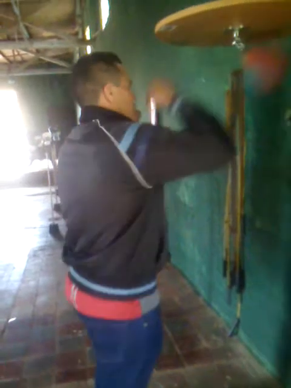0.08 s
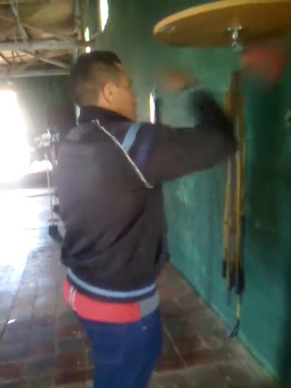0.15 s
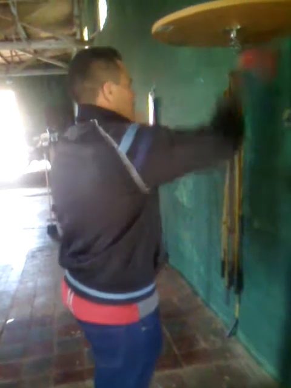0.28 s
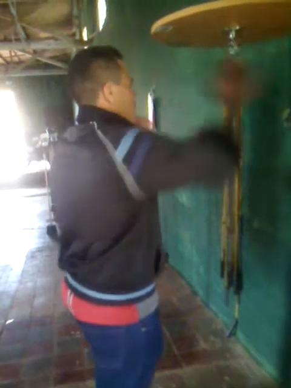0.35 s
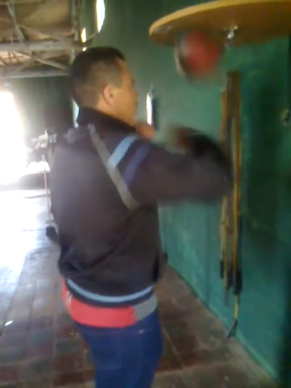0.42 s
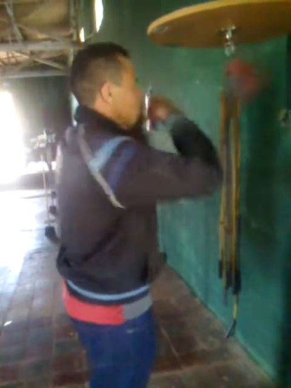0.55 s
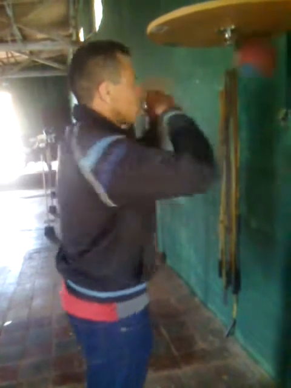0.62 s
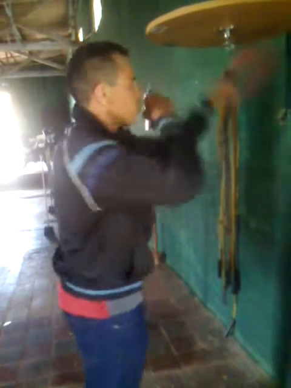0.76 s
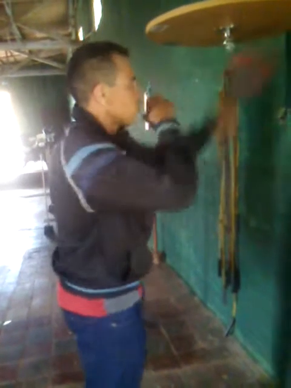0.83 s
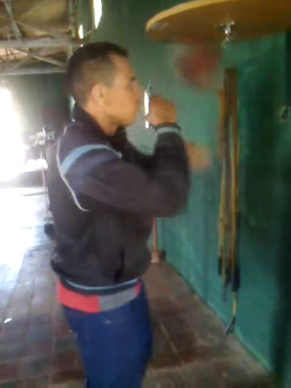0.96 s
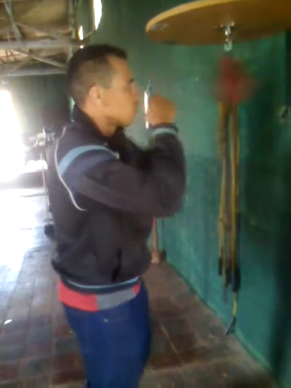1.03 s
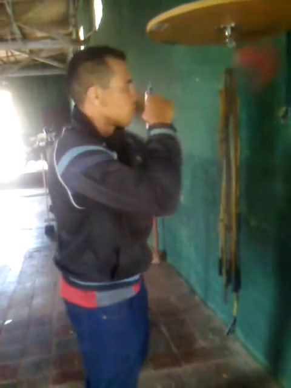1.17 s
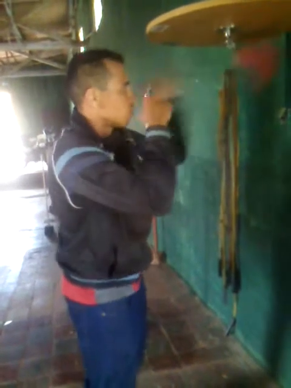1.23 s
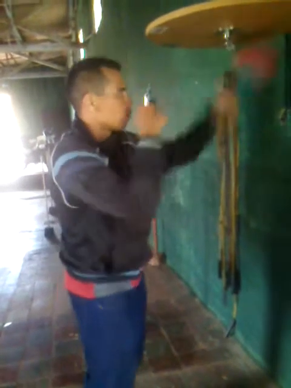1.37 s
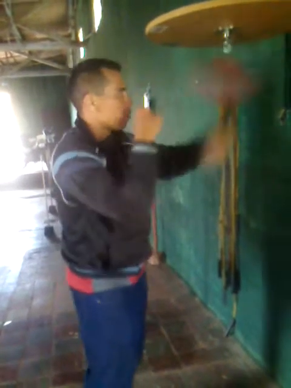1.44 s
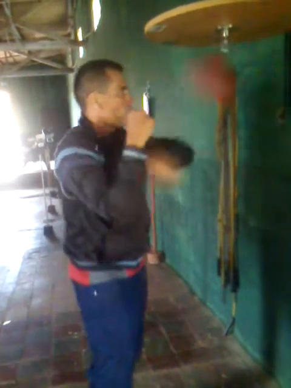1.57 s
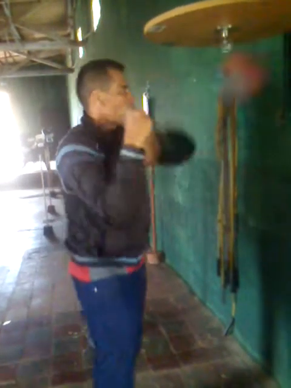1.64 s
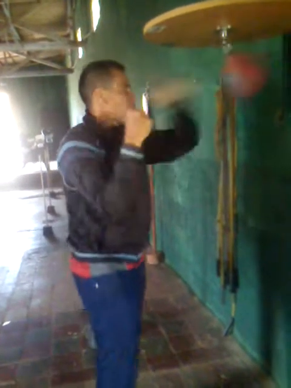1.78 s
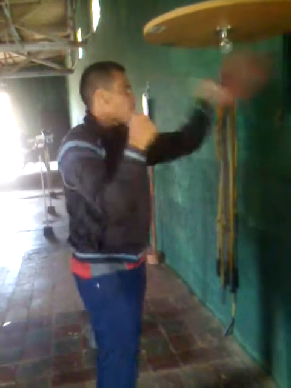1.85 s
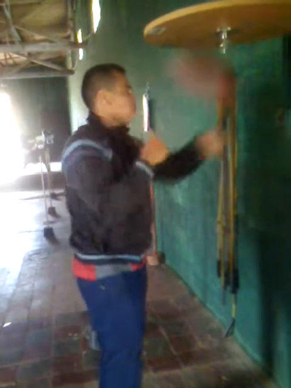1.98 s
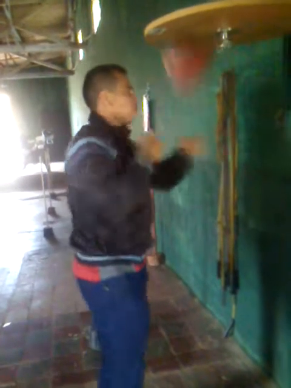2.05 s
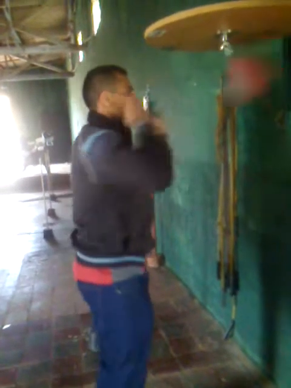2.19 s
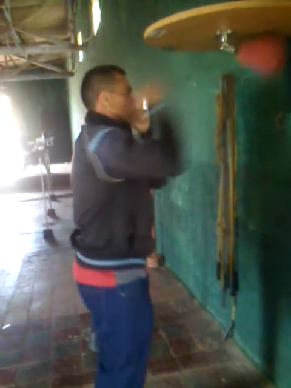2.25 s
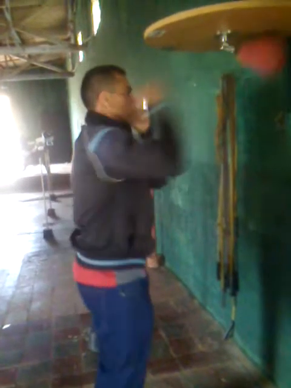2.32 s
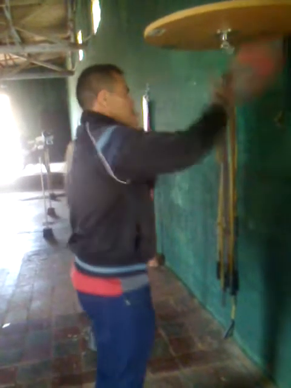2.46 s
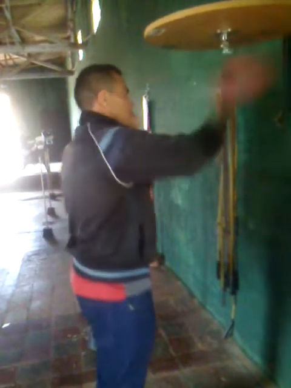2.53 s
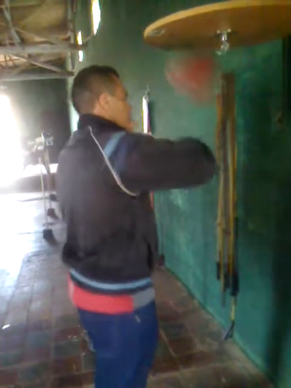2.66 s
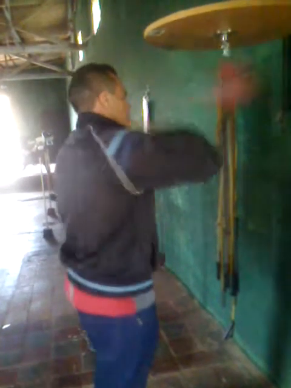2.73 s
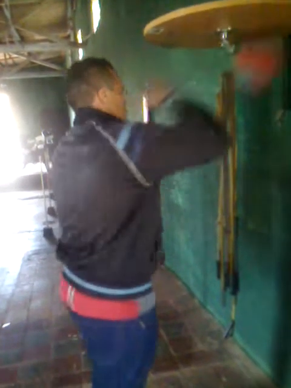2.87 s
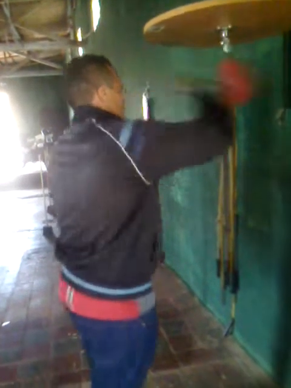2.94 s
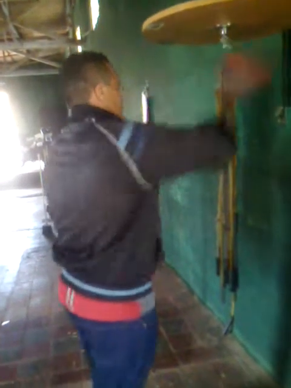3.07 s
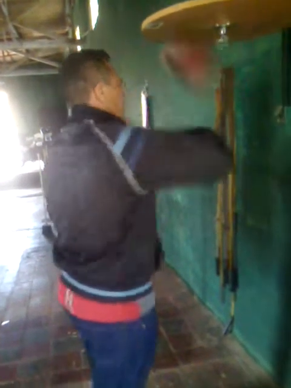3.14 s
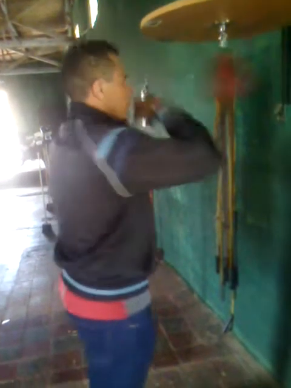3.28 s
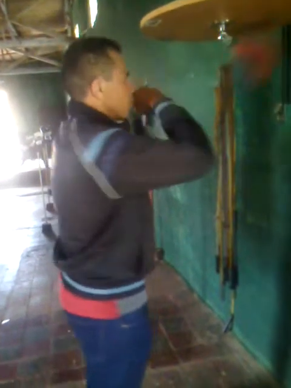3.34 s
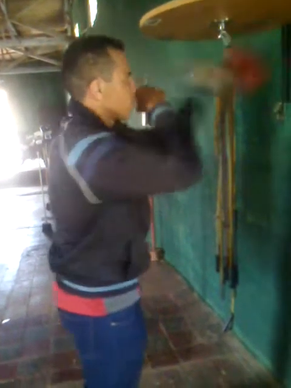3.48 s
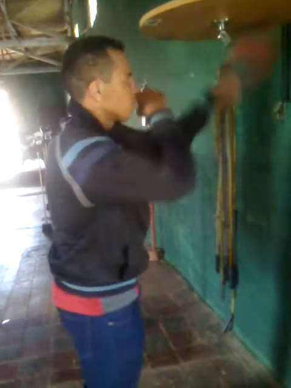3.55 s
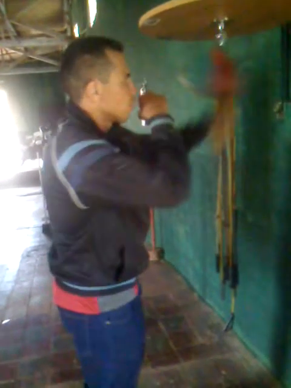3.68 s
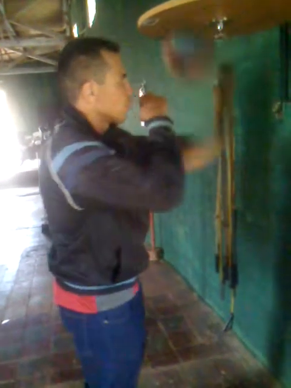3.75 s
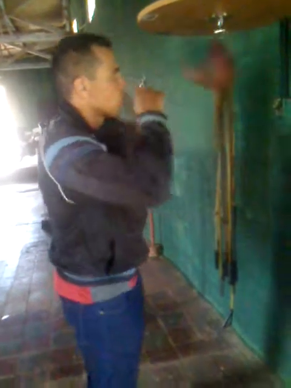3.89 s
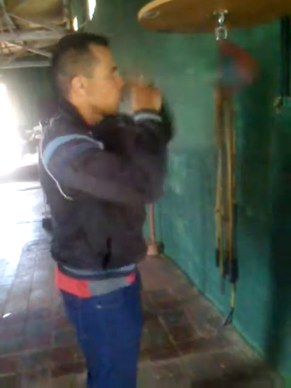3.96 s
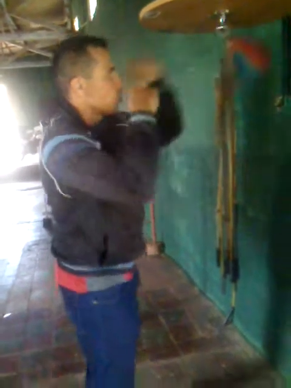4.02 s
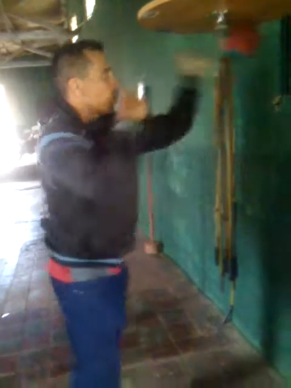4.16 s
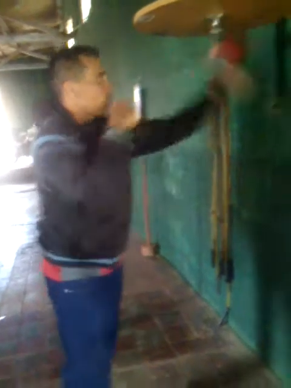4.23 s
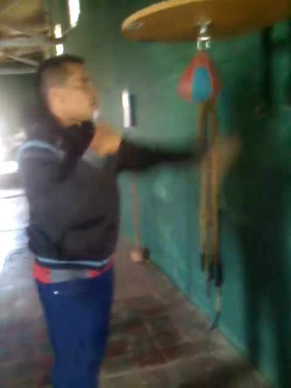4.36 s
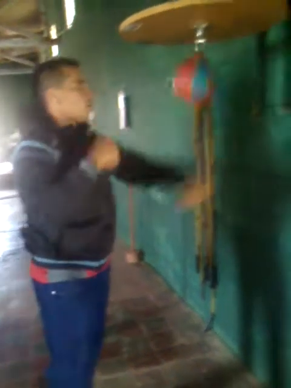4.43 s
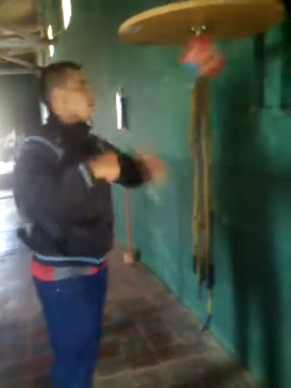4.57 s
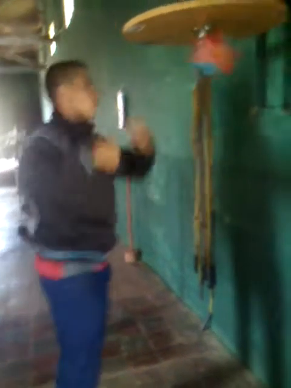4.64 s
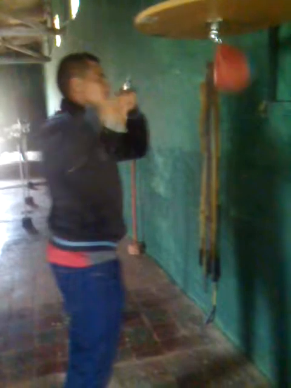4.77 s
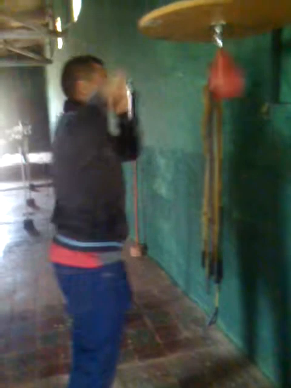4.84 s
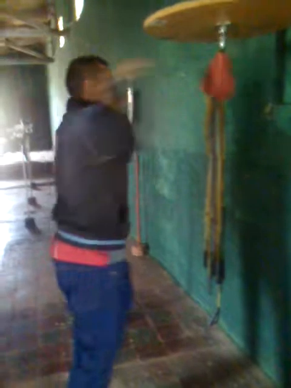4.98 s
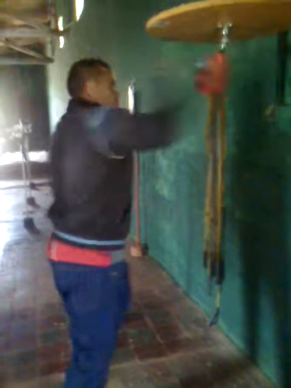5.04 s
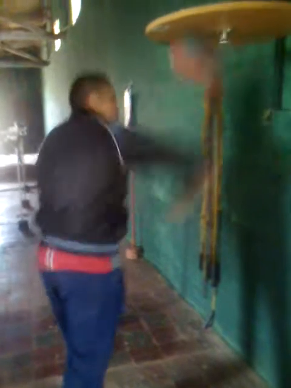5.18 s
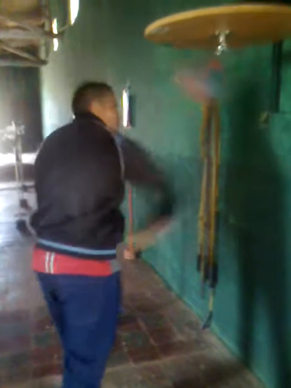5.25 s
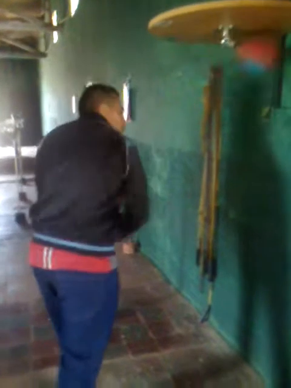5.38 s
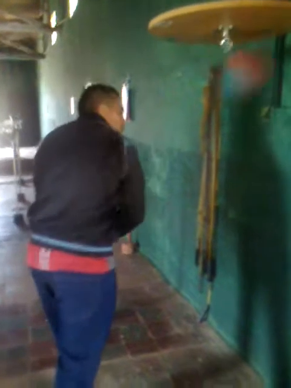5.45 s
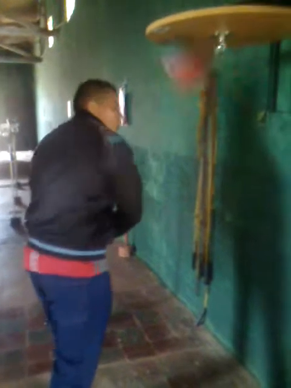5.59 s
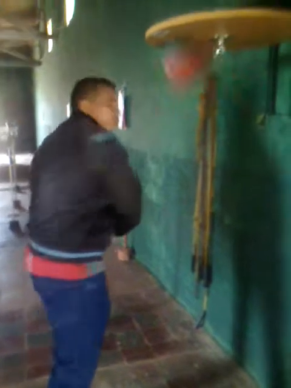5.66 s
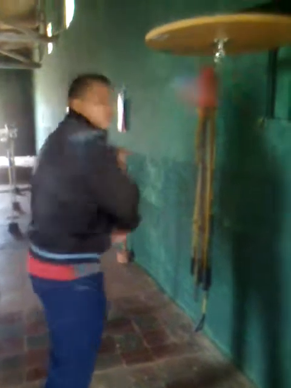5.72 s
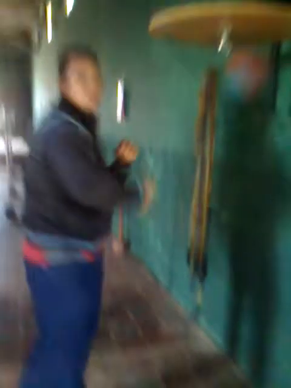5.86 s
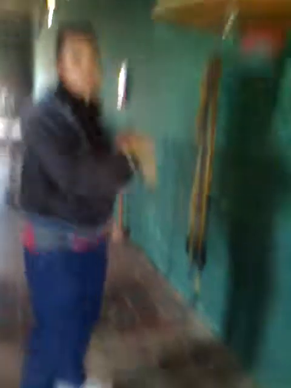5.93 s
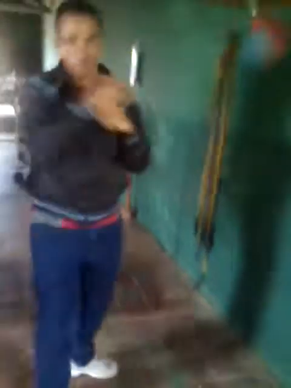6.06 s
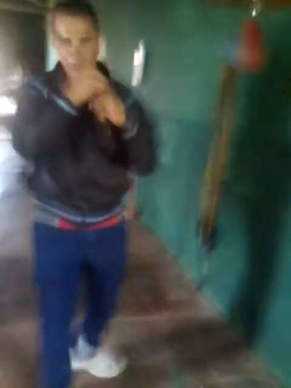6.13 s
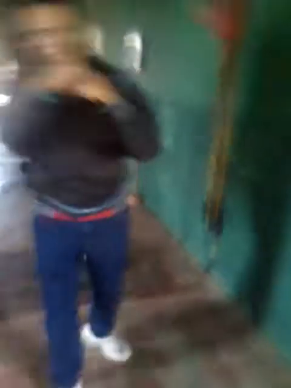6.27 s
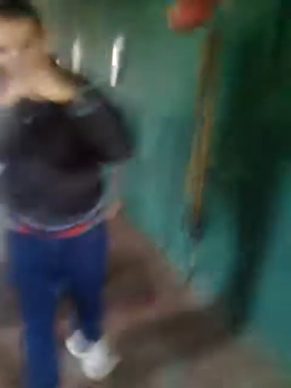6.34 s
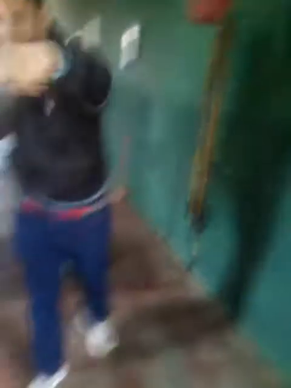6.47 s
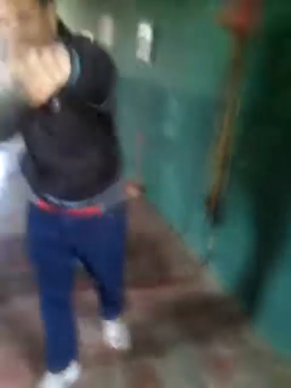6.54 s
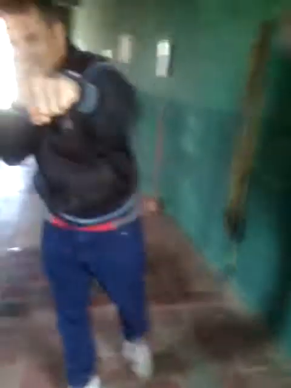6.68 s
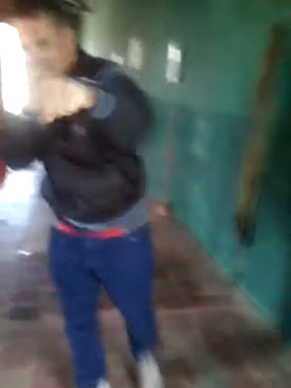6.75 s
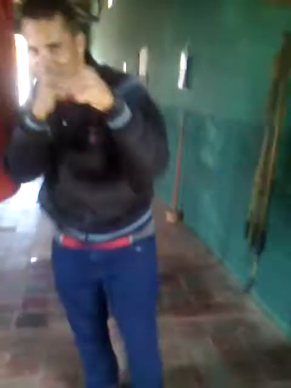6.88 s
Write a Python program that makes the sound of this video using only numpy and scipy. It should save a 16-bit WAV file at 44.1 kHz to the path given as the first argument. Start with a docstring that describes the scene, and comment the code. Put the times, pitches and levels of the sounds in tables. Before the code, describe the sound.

Fast, even leather slaps on a speed bag knock and rattle its board in an echoing hall, then break into scattered hits and jacket swishes.

```python
"""A thud of fist and board opens a run of blows on a speed bag in a bare hall with a tiled floor.
Leather slaps are shaped noise with sharp pulses; the round board knocks, booms and shudders in struck modes.
The steel swivel chinks, ticks and grinds in ringing links, and the board buzzes in random grains.
Later the boxer's nylon jacket swishes in bands of noise. Decaying noise echoes make the hall ring on."""
import sys
import numpy as np
from scipy import signal
from scipy.fft import rfft, irfft, next_fast_len
from scipy.io import wavfile

SR = 44100
rng = np.random.default_rng(int(sys.argv[2]) if len(sys.argv) > 2 else 0)


def materialize(psi):
    """Save the field psi as 16-bit PCM at rate SR to the path in sys.argv[1].

    A 1-D psi becomes a single channel; in a 2-D psi each row is a channel.
    """
    bounded = np.clip(np.atleast_2d(psi).T, -1, 1)
    quanta = np.round(bounded * 32767).astype(np.int16)
    wavfile.write(sys.argv[1], SR, quanta)


N = 304720
LEAD = 4096  # samples of room before time zero, for sounds that start early
SPOTS = 3  # separate hall feeds, dealt to the blows in turn


def from_db(db):
    """Gain of a level in dB."""
    return 10 ** (np.asarray(db) / 20)


def rms_one(x):
    """Scale to rms 1."""
    return x / np.sqrt(np.mean(x ** 2) + 1e-20)


def at_hz(points, hz, index=1):
    """Read a table column on a log-frequency axis."""
    rows = np.array(points)
    return np.interp(np.log(np.maximum(hz, 1)), np.log(rows[:, 0]), rows[:, index])


def coloured(x, points):
    """Shape a signal by a spectrum in dB."""
    size = next_fast_len(len(x) + 4 * LEAD)
    gain = from_db(at_hz(points, np.fft.rfftfreq(size, 1 / SR)))
    return irfft(rfft(x, size) * gain, size)[:len(x)]


def ring(force, hz, t60):
    """A damped mode: a unit click sets a sine of about height 1 ringing."""
    r, w = from_db(-60 / (t60 * SR)), 2 * np.pi * hz / SR
    return signal.lfilter([0, np.sin(w)], [1, -2 * r * np.cos(w), r * r], force + 1e-18)


def resonance(x, hz, width_hz):
    """A resonant band with a gain of about 1 at its centre."""
    r = np.exp(-np.pi * width_hz / SR)
    feedback = [1, -2 * r * np.cos(2 * np.pi * hz / SR), r * r]
    return signal.lfilter(np.array([1, 0, -1]) * (1 - r * r) / 2, feedback, x)


def band(x, hz, width_hz):
    """A resonance passed twice, for steep skirts."""
    hz = np.clip(hz, 100, 15000)
    return resonance(resonance(x, hz, width_hz), hz, width_hz)


def lumpy(size, spread_db, count):
    """Random gain with a new target every count samples, joined by straight lines in dB."""
    targets = rng.standard_normal(size // count + 2)
    return from_db(spread_db * np.interp(np.arange(size) / count, np.arange(size // count + 2), targets))


def add(out, s, x):
    """Mix x in at second s."""
    part = out[round(s * SR) + LEAD:][:len(x)]
    part += x[:len(part)]


def struck(modes, force, chance_db):
    """One force drives a set of modes, each with its own extra level in dB."""
    return sum(from_db(db + c) * ring(force, hz, t60) for (hz, db, t60), c in zip(modes, chance_db))


def shaking(delay_s, t60, extra_db):
    """Every blow starts a shake as strong as its slap, which then dies away."""
    shake = np.zeros(N + LEAD)
    for (s, slap_db, *rest), extra in zip(BLOWS, extra_db):
        add(shake, s + delay_s, from_db([slap_db + extra]))
    return signal.lfilter([1], [1, -from_db(-60 / (t60 * SR))], shake + 1e-18)


CRACK_AT_S, CRACK_S = .0013, .000042  # first pulse: its delay and width
CRACK_GAP_S, CRACK_LOSS_DB, CRACK_SLOWS = .0011, 3.5, 1.3  # each later fold: spacing, loss, times longer


def cracks(t, chance):
    """Folding leather snaps as N-shaped pulses, unevenly spaced and sinking in pitch; the first has rms 1."""
    k = np.arange(len(chance))
    at = CRACK_AT_S + CRACK_GAP_S * (k + .25 * chance * (k > 0))
    x = (t[:, None] - at) / (CRACK_S * CRACK_SLOWS ** k)
    level_db = -CRACK_LOSS_DB * k + 2 * np.roll(chance, 1) * (k > 0)
    pulses = -x * np.exp(-x ** 2 / 2) * from_db(level_db) * (-1) ** (k // 2)
    first = resonance(pulses[:, 0], 4500, 9000)
    return resonance(pulses.sum(axis=1), 4500, 9000) / np.std(first)


# opening crack of the hard slaps: kind, level_db against the slap layers before their trim
CRACK_LEVELS = {"punch": 0, "slam": -2, "rebound": -3}
SOFT_CRACK_DB = -14  # for every other kind


def leather_slap(t, noise, chance, blow, slap_hz, soft_db):
    """The slap darkens as the patch of contact grows; weak blows land softly and last longer."""
    s, slap_db, knock_db, bright_db, snap_db, boom_db, kind = blow
    crackle, patter, edge = noise
    soft = from_db(soft_db - 0.23 * (slap_db - 1.5))
    rise = 1 - np.exp(-np.maximum(t - CRACK_AT_S, 0) / (0.00048 * soft))
    bright = band(crackle * rise * np.exp(-t / (0.00088 * soft ** 0.9)), 0.95 * slap_hz, 3600.0)
    dull_fade = t / 0.0048 * np.exp(-t / 0.0036) + 0.082 * np.exp(-t / 0.2)
    dull = band(patter * rise * dull_fade, 0.5 * slap_hz, 4300.0)
    snap_fade = np.exp(-t / 0.0015) + .04 * np.exp(-t / .016)
    treble = signal.butter(2, [6500, 13000], "band", fs=SR, output="sos")
    snap = signal.sosfilt(treble, edge * rise * snap_fade)
    layers = rms_one(bright) + from_db(-bright_db) * rms_one(dull) + from_db(snap_db) * rms_one(snap)
    return 0.78 * layers + from_db(CRACK_LEVELS.get(kind, SOFT_CRACK_DB)) * cracks(t, chance)


# modes of the board that knock: pitch_hz, level_db, t60_s
KNOCK_MODES = [(230, -6, .04), (365, -4, .05), (420, -4, .04), (490, -2, .045), (600, -5, .045),
               (745, -6, .025), (890, -4, .028), (990, -3, .03), (1100, -2, .04), (1280, -4, .03),
               (1450, -4, .03), (1760, -9, .05), (2630, -12, .04)]


def board_knock(force, knock_hz, knock_db, chance):
    """A rough force plays the board; the spot struck favours some modes."""
    favoured_db = -3.5 * np.abs(np.log2(np.array(KNOCK_MODES)[:, 0] / knock_hz))
    knock = struck(KNOCK_MODES, force, favoured_db + 2 * chance)
    return from_db(knock_db) * knock / np.abs(knock).max()


BOOM_TILT_DB, BOOM_TILT_FROM_DB = .35, -24  # per dB of knock and mode number; knock level where it begins
BOOM_CHANCE_DB, BOOM_WAVER_DB = 1.5, 2.5
BOOM_SWELL_S, BOOM_HELD_S, BOOM_LEFT = .003, .04, .5  # slow bend; the bracket damps 1.5 toward 0.5
# close low modes of the board that beat: pitch_hz, level_db, t60_s
BOOM_MODES = [(114.03, -2, 0.84), (137.6, -6.5, 0.69), (156.8, 2, 0.24), (194.4, -1.5, 0.14),
              (223, -4.5, 0.12)]


def board_boom(t, knock_db, boom_db, chance):
    """The board bends slowly and its boom dies unevenly; the hardest knocks favour the upper modes."""
    count = len(BOOM_MODES)
    tilt_db = BOOM_TILT_DB * max(knock_db - BOOM_TILT_FROM_DB, 0) * np.arange(count)
    push = t / .0022 * np.exp(-t / 0.00013)
    boom = struck(BOOM_MODES, push, BOOM_CHANCE_DB * chance[:count] + tilt_db)
    swell = 1 - np.exp(-t / BOOM_SWELL_S)
    damping = BOOM_LEFT + np.exp(-t / BOOM_HELD_S)
    boom = boom * swell * lumpy(len(t), BOOM_WAVER_DB, count=900) * damping
    return -from_db(knock_db + boom_db) * boom / np.abs(boom).max()


SCATTER_S, SCATTER_SHARE = .012, .75  # gear and beams smear this share of the slap's power sent to the walls
KNOCK_TO_HALL_DB, BOOM_TO_HALL = -4, .1  # the knock carries less far than the slap, the bass weakly
# kinds of contact: kind, then slap_hz, knock_hz (centres), hall_send_db, landing_softness_db
CONTACTS = {"punch": (4780, 510, 3.84, 9), "rebound": (4493, 807.5, 9, 5), "thud": (3091.5, 896, 5.5, 4),
            "tap": (4400, 780, 4.8, 4.6), "flick": (4299, 424.5, 6.5, -8), "tick": (3290.5, 590.5, 13, 1.5),
            "clack": (2400, 3100, 0.86, 17), "bump": (3905, 486, 8, 1), "slam": (4269, 998, 6, -4.5)}
# blows on the bag: start_s, slap_level_db, knock_peak_db, bright_over_dull_db,
# snap_over_bright_db, boom_over_knock_db, kind
BLOWS = [(-0.024, -25, -22.5, 11, -36, -7, "thud"), (0.0296, -35.5, -43.5, 3, -9, -12, "tap"),
         (0.1487, -44.5, -54, -2, -29, -8, "tap"), (0.176, -40.5, -37, -3.5, 0.5, -5, "flick"),
         (0.285, -49.5, -44, 10.5, -1, 4, "tick"), (0.3447, -27, -29.5, 19, 7.5, 3, "punch"),
         (0.44, -37.5, -42.5, -1, -22, -20, "bump"), (0.502, -28.5, -31, 4, 0, -1.5, "rebound"),
         (0.53, -32.5, -25, 5.5, -30, -27, "clack"), (0.5901, -36, -46, 8, -37.5, -17, "thud"),
         (0.688, -44, -49, 11, -28.5, -8, "tap"), (0.7178, -40.5, -36, -4, -2, -8, "flick"),
         (0.7854, -43.5, -28.5, 11, -37, -16, "thud"), (0.82, -46.5, -27, 13.5, 1, -37, "clack"),
         (0.863, -48, -66, 20, 7, -2.5, "tick"), (0.8811, -19.5, -29, 12, 2, 6.5, "punch"),
         (0.978, -51.5, -59, 9, -5, -10, "tap"), (1.0384, -30, -28.5, 15, 2, -4, "rebound"),
         (1.069, -42, -37.5, 12, -30, -28, "clack"), (1.219, -43.5, -31, 5, -29, -21.5, "tap"),
         (1.2543, -40, -34, 8, -5, -6, "flick"), (1.365, -57, -40.5, 9.5, 11, -2.5, "tick"),
         (1.4248, -25.5, -28, 15, 2.5, 2.5, "punch"), (1.455, -42.5, -27.5, 7, -19, 2.5, "thud"),
         (1.511, -41, -53, 5.5, -20, -10, "tap"), (1.5788, -23, -31, 17, -6, 1, "rebound"),
         (1.608, -35, -32, 2, -32, -7, "thud"), (1.668, -33.5, -42, 12, -30, -17, "thud"),
         (1.7867, -41.5, -35, -3, -2, -6, "flick"), (1.9099, -43.5, -39, 4, 12, -5, "tick"),
         (1.924, -45.5, -55, 4.5, -11, -7.5, "tap"), (1.9732, -20.5, -27, 8, 3.5, 5, "punch"),
         (2.074, -50, -62, 12, 6, -10, "tick"), (2.093, -51, -60, 12, 2, -10, "tick"),
         (2.0861, -37, -32.5, -1, -30, -2, "thud"), (2.1298, -33.5, -28.5, 3, 6, -10, "rebound"),
         (2.16, -29, -23.5, 10, -30, -11.5, "thud"), (2.264, -50, -58, 0, -29, -13, "tap"),
         (2.3144, -42, -63, -4, -29, -7.5, "tap"), (2.362, -43, -42, 7, -2, 3, "flick"),
         (2.374, -69, -69, 12, 3, -10, "tick"), (2.4699, -57, -48.5, 4, 5, 3, "tick"),
         (2.5249, -25.5, -27, 7.5, 3.5, 3.5, "punch"), (2.6814, -28.5, -32, 9.5, -2.5, -1, "rebound"),
         (2.7053, -34, -22.5, 11, -25, -23, "clack"), (2.8573, -41.5, -53, 7.5, -20, -7.5, "tap"),
         (2.894, -38.5, -41, 3, -5.5, -5.5, "flick"), (3.023, -51, -44.5, 12.5, 4, 4, "tick"),
         (3.054, -55, -58, 7.5, 0, 0, "tick"), (3.0928, -26, -30.5, 12, 5.5, 4, "punch"),
         (3.204, -34, -33.5, 15.5, -20.5, -17, "bump"), (3.259, -34, -36.5, 17, 7.5, -2, "rebound"),
         (3.289, -58, -34.5, 12.5, -30, -17, "bump"), (3.335, -41.5, -49, 7, -30, -17, "bump"),
         (3.39, -62, -64, 8.5, -29, -8, "tap"), (3.479, -47.5, -41, 4.5, 7.5, -1.5, "flick"),
         (3.586, -54, -45.5, 6, 9, -2, "tick"), (3.625, -49.5, -67, 2, 7, -2, "tick"),
         (3.64, -16, -21, 8.5, -4.5, 3.5, "slam"), (3.843, -49, -45.5, 5, -1, -1, "flick"),
         (4.0634, -54.5, -47.5, 8, -28.5, 1.5, "thud"), (5.0605, -55, -61, 17, -28, -1, "thud"),
         (5.1098, -36.5, -31, 10, -13, -3.5, "tick"), (5.123, -38, -53, 0, 5, -1, "tick"),
         (5.1421, -18.5, -19.5, 15.5, 4.5, 3.5, "slam"), (5.253, -22.5, -29.5, 1.5, -4, -8, "rebound"),
         (5.2902, -31.5, -17, 18, -30, -27, "clack"), (5.3464, -35.5, -37, -5, -30, -18, "bump"),
         (5.45, -45, -29.5, -9, -8, -25, "bump"), (5.7172, -47.5, -53, 13.5, -10, -10, "thud"),
         (5.732, -63, -61, 9, -4, -10, "tick"), (6.2506, -55, -52.5, 3, -5, -16, "flick"),
         (6.7075, -58.5, -54, 6.5, -31, -5.5, "thud"), (6.839, -73.5, -75, 12, -5, -10, "flick")]


def blows():
    """Each blow is a slap of leather, a knock and a slower boom of the board; gives direct sound and hall feeds."""
    near, *far = np.zeros((1 + SPOTS, N + LEAD))
    t = np.arange(SR // 2) / SR
    short = t[:2048]
    noise = rng.standard_normal((len(BLOWS), 4, 2048))
    chance = rng.standard_normal((len(BLOWS), 3, len(KNOCK_MODES)))
    contact = np.zeros(len(t))
    for k, blow in enumerate(BLOWS):
        s, slap_db, knock_db, bright_db, snap_db, boom_db, kind = blow
        slap_hz, knock_hz, hall_db, soft_db = CONTACTS[kind]
        edge, grit = noise[k, 2:]
        slap = leather_slap(short, noise[k, :3], chance[k, 2, :6], blow, slap_hz, soft_db)
        # the bag flattens over a few ms, so the board is pushed by a rough, soft force
        contact[:2048] = grit * short / .004 * np.exp(-short / 0.0036)
        knock = board_knock(contact, knock_hz, knock_db, chance[k, 0])
        boom = board_boom(t, knock_db, boom_db, chance[k, 1])
        smeared = rms_one(band(edge * np.exp(-short / SCATTER_S), 0.65 * slap_hz, 5500.0))
        sent = np.sqrt(1 - SCATTER_SHARE) * slap + np.sqrt(SCATTER_SHARE) * smeared
        both = from_db(slap_db) * np.array([slap, sent])
        slap, sent = np.pad(both, ((0, 0), (0, len(t) - len(short))))
        add(near, s + 0.0011, slap + knock + boom)
        to_hall = sent + from_db(KNOCK_TO_HALL_DB) * knock + BOOM_TO_HALL * boom
        add(far[k % SPOTS], s, from_db(hall_db) * to_hall)
    return near, far


HALL_DB, HALL_RISE_S = -36.5, 0.0023
# far wall, a cluster of echoes: late_s, level_db over its neighbours, spread_s
WALL_CLUSTER = (0.076, 3.1, 0.0007)
# ring of the hall by band: pitch_hz, level_db, t60_s
HALL_BANDS = [(61.6, -1, 0.62), (166, 9, 0.75), (340, 3.5, 1), (534, 12, 0.81), (1100, 12.5, 0.56),
              (1480, 3.5, 0.78), (2130, -8.5, 0.71), (5100, -6, 0.62), (7600, -5.5, 0.44),
              (12100, -14.5, 0.16)]


def hall(x):
    """Dense noise echoes build up over some ms and die away band by band."""
    t = np.arange(int(1.2 * SR)) / SR
    edges = 40 * 2 ** np.arange(0, 9, .5)  # half-octave bands
    white = rng.standard_normal((2, len(t)))
    echoes = 0
    for k, (low, high) in enumerate(zip(edges, edges[1:])):
        half_octave = signal.butter(2, [low, high], "band", fs=SR, output="sos")
        layer = lumpy(len(t), 3.28, count=300) * signal.sosfilt(half_octave, white[k % 2])
        hz = np.sqrt(low * high)
        fade_db = at_hz(HALL_BANDS, hz) - 60 * t / at_hz(HALL_BANDS, hz, index=2)
        echoes = echoes + layer * from_db(fade_db)
    echoes = echoes * lumpy(len(t), 1.0, count=200)  # walls and gear return uneven clusters
    late_s, wall_db, spread_s = WALL_CLUSTER
    wall = from_db(wall_db * np.exp(-((t - late_s) / spread_s) ** 2))
    echoes = echoes * np.minimum(t / HALL_RISE_S, 1) * wall
    return from_db(HALL_DB) * signal.fftconvolve(x, echoes)[:len(x)]


# modes of the swivel links, for ticks and grinding: pitch_hz, level_db, t60_s (ticks only)
LINK_MODES = [(1790, -2, 0.072), (2700, 4, 0.033), (3385, -5, 0.017), (4400, 1, .03), (4650, -9, .03),
              (6020, 5.5, .03), (7600, -1, .03)]


def rattle():
    """After each blow the loose swivel ticks at random, fainter as the shaking dies."""
    shake = shaking(0, .45, np.zeros(len(BLOWS)))
    size = len(shake)
    hits = rng.random(size) < 120 / SR  # about 120 per second
    ticks = hits * from_db(3.6 * np.minimum(rng.exponential(1, size), 4))
    dealt = rng.integers(0, len(LINK_MODES), size)
    ticks = np.convolve(ticks, np.hanning(7) / 3, "same")
    dealt = dealt[np.arange(size) // 64]  # one link takes the ticks for 64 samples
    links = 0
    for k, (hz, db, t60) in enumerate(LINK_MODES):
        links = links + from_db(db) * ring(shake * ticks * (dealt == k), hz, t60)
    return from_db(-13.5) * links


JANGLE_DB, JANGLE_T60_S, JANGLE_WIDTH_HZ = -26, 0.4, 180  # width of each of two filter passes
JANGLE_CHANCE_DB, JANGLE_WAVER_DB = 4, 5


def jangle():
    """Shaken links grind on each other: wavering noise at each pitch, stirred differently by each blow."""
    out = 0
    chance = rng.standard_normal((len(BLOWS), len(LINK_MODES)))
    white = rng.standard_normal(N + LEAD)
    for k, (hz, db, t60) in enumerate(LINK_MODES):
        shake = shaking(0.0029, JANGLE_T60_S, JANGLE_CHANCE_DB * chance[:, k])
        waver = lumpy(len(shake), JANGLE_WAVER_DB, count=500)
        out = out + from_db(db) * shake * waver * rms_one(band(white, hz, JANGLE_WIDTH_HZ))
    return from_db(JANGLE_DB) * out


BUZZ_PER_S, BUZZ_DB, BUZZ_T60_S = 1000, -37.5, 0.48  # grain rate; level set by the loudest slap
BUZZ_HZ, BUZZ_WIDTH_HZ = 2970, 7600  # width of each of two filter passes


def buzz():
    """The shaken board chatters on its mount: dense, uneven grains that die after each blow."""
    shake = shaking(0.0068, BUZZ_T60_S, np.zeros(len(BLOWS)))
    size = len(shake)
    shake = shake * lumpy(size, 2.3, count=400)
    hits = rng.random(size) < BUZZ_PER_S / SR
    grains = hits * from_db(4 * np.minimum(rng.exponential(1, size), 5))
    grains = band(grains * rng.choice([-1, 1], size), BUZZ_HZ, BUZZ_WIDTH_HZ)
    loudest_db = np.max([row[1] for row in BLOWS])
    return shake * from_db(BUZZ_DB - loudest_db) * rms_one(grains)


RUB_SHARE, RUB_MAX_S = .12, .04  # the contact rattles for a share of the ring, up to a limit
PARTNERS_HZ, LINK_WAVER_DB = (60, -45), 3.5  # offsets of the neighbour modes; the ring wavers as it swings
# chinks of the swivel: start_s, peak_db, pitch_hz, t60_s
CHINKS = [(0.159, -33, 1780, 0.079), (0.407, -24, 7730, 0.1), (.443, -28, 4500, .03),
          (0.954, -20, 7600, 0.098), (1.006, -30, 1706, 0.2), (1.221, -38, 4400, 0.17),
          (1.271, -34, 1793, 0.13), (1.542, -28, 7660, 0.11), (1.944, -28, 7120, 0.067),
          (2.29, -34, 4400, 0.065), (2.63, -37, 7700, 0.018), (2.644, -29, 1790, 0.14),
          (.012, -22, 6020, 0.066), (.028, -30, 7900, 0.076), (0.199, -32, 6700, .05),
          (0.594, -27, 6020, 0.043), (2.059, -41, 7640, .05), (2.195, -37, 7850, 0.09),
          (2.861, -31, 4400, 0.059), (2.898, -52, 3500, 0.065), (3.058, -35, 2600, 0.12),
          (3.185, -20, 7600, 0.034), (3.209, -23.5, 4400, 0.037), (3.212, -20, 3300, 0.054),
          (3.34, -25, 4450, 0.047), (3.341, -29, 2620, 0.039), (3.346, -34, 5150, 0.11),
          (3.387, -26.5, 2605, 0.054), (3.403, -33.5, 1758, 0.15), (3.429, -35, 1756, 0.18),
          (3.48, -40, 1740, 0.17), (3.482, -31, 4800, 0.03), (3.484, -40, 3550, 0.1),
          (3.74, -22, 3050, 0.033), (3.645, -39, 1750, 1), (4.064, -36, 1747, 0.061),
          (4.099, -51, 1720, 0.64), (4.58, -52, 7150, 0.17), (5.123, -18, 3420, 0.076),
          (5.206, -15, 7600, 0.067), (5.21, -34, 9300, 0.094), (5.23, -22, 7600, 0.11),
          (5.275, -16, 12300, 0.036), (5.297, -34, 6020, .04), (5.308, -27, 12400, 0.046),
          (5.455, -28.5, 3500, 0.047), (5.31, -17.5, 3570, 0.053), (5.455, -26, 2605, 0.045),
          (5.72, -39.5, 1270, 0.025), (5.722, -42, 3500, 0.035), (5.92, -42, 2650, 0.19),
          (6.0, -46, 2475, .15), (6.05, -57, 2320, 0.14), (0.031, -36, 1758, 0.17), (2.2, -34, 6020, .03),
          (3.41, -45.5, 3500, 0.18), (6.711, -61, 2600, .15), (6.759, -71, 1740, .3)]


def swivel():
    """A link rings at its pitch with two close partners while the contact rattles."""
    out = np.zeros(N + LEAD)
    for (s, db, hz, t60), grit in zip(CHINKS, rng.standard_normal((len(CHINKS), SR))):
        t = np.arange(min(int(SR * (t60 + RUB_MAX_S)), SR)) / SR
        grit = grit[:len(t)]
        rub = t * np.exp(-2 * t / min(RUB_SHARE * t60, RUB_MAX_S))
        force = resonance(grit * np.abs(grit) * rub, hz, 550.0)
        link = ring(force, hz, t60)
        link = link + 0.6 * ring(force, hz + PARTNERS_HZ[0], t60)
        link = link + 0.5 * ring(force, hz + PARTNERS_HZ[1], t60)
        link = link * lumpy(len(t), LINK_WAVER_DB, count=700)
        add(out, s, from_db(db) * link / np.abs(link).max())
    return out


SHUDDER_FOCUS_DB_PER_OCT, SHUDDER_TO_HALL_DB = 9, -5.5
# shudders of the board on its bracket: start_s, level_db, favoured_hz, swell_s, t60_s
SHUDDERS = [(.54, -34.5, 1070, .015, 0.22), (.6, -45, 450, .03, 0.4), (1.07, -42, 990, .015, 0.35),
            (1.09, -39, 440, .04, 0.18), (1.604, -32.5, 1050, 0.011, .2), (1.615, -45.5, 400, .02, 0.33),
            (2.155, -35, 1120, 0.0092, 0.23), (2.189, -44, 412, .03, 0.32), (2.715, -37.5, 530, 0.017, .25),
            (2.719, -36.5, 1100, .02, 0.24), (3.22, -46.5, 508, .05, 0.22),
            (3.299, -52.5, 565, 0.023, 0.13), (3.35, -51.5, 1006, .03, 0.12),
            (5.165, -25.5, 238, 0.0079, 0.25), (5.185, -42, 1050, 0.012, 0.22), (5.21, -36, 460, .02, 0.32),
            (5.286, -27.5, 1050, 0.012, 0.13), (5.34, -43, 489, .03, 0.58), (5.56, -55, 580, .03, 0.71)]


def shudder():
    """A rough, uneven force plays the board near a favoured pitch; the sound swells and dies."""
    out, t = np.zeros(N + LEAD), np.arange(SR // 2) / SR
    for (s, db, hz, swell_s, t60), grit in zip(SHUDDERS, rng.standard_normal((len(SHUDDERS), len(t)))):
        shape = (1 - np.exp(-t / swell_s)) ** 2 * from_db(-60 * t / t60)
        near_db = -SHUDDER_FOCUS_DB_PER_OCT * np.abs(np.log2(np.array(KNOCK_MODES)[:, 0] / hz))
        board = struck(KNOCK_MODES, grit * lumpy(len(t), 4.5, count=500), near_db)
        add(out, s, from_db(db) * rms_one(board) * shape / shape.max())
    return out


WEAVE_WANDER_DB, FOLD_DB = 3.2, 2  # the fold that rubs hardest lifts one band
DARKENS_DB_PER_OCT_S, TRAIL_DB, TRAIL_DB_PER_S = 41, -37, 73  # a swing dulls and leaves a faint rustle
# bands of the nylon weave: pitch_hz, width_hz (of each filter pass), level_db
WEAVE_BANDS = [(2180, 1150, -14), (3300, 820, -10.5), (4400, 350, -4), (6250, 1550, 1.5), (7600, 4300, 3)]
# swings of the arms: fastest_s, held_s, rub_level_db, rise_db_per_s, fall_db_per_s,
# brightness_db_per_octave, flap_db (set against the weave), lifted_hz
SWINGS = [(4.439, 0.071, -37.5, 445, 327, -8.5, -4.5, 2180), (4.88, 0.087, -49.5, 160, 190, -8, -4, 2180),
          (5.926, 0.072, -60.5, 156, 87.5, -18, 0.5, 4400), (6.042, 0.013, -50, 100, 202, -2.5, -0.5, 4400),
          (6.262, 0.047, -54.5, 88, 89, -5, -5, 4400), (6.502, 0.0074, -42.5, 251, 403, -13, 4, 4400)]


def jacket():
    """Nylon rubs on nylon: grainy noise in the bands of the weave plus a broad flap, duller as a swing goes on."""
    out, t = np.zeros(N + LEAD), np.arange(SR) / SR - .5  # seconds from the fastest moment
    for s, held_s, rub_db, rise_db, fall_db, bright_db, flap_db, fold_hz in SWINGS:
        grains = rng.standard_normal((2, len(t))) * lumpy(len(t), 2.5, count=60)
        before, after = np.maximum(-t, 0), np.maximum(t - held_s, 0)
        bright = bright_db - DARKENS_DB_PER_OCT_S * np.clip(t - held_s / 2, -.1, .1)
        weave = 0
        for hz, width_hz, db in WEAVE_BANDS:
            rub = rms_one(band(grains[0], hz, width_hz)) * lumpy(len(t), WEAVE_WANDER_DB, count=800)
            lift_db = FOLD_DB * (abs(hz / fold_hz - 1) < .15)
            weave = weave + from_db(db + bright * np.log2(hz / 4000) + lift_db) * rub
        flap = rms_one(band(band(grains[1], 3300, 3900.0), 3300, 5500.0))
        trail = from_db(TRAIL_DB - TRAIL_DB_PER_S * after)
        stroke = from_db(rub_db - rise_db * before) * (from_db(-fall_db * after) + trail)
        add(out, s - .5, stroke * (weave + from_db(flap_db) * flap))
    return out


def scene():
    """Bag, board, swivel and jacket, with the blows dealt over hall feeds that each have their own echoes."""
    near, far = blows()
    board = shudder()
    small = swivel() + rattle() + jangle() + buzz() + jacket()
    first_feed = far[0] + 0.78 * small + from_db(SHUDDER_TO_HALL_DB) * board
    echoes = sum(hall(feed) for feed in [first_feed] + far[1:])
    return (near + small + board + echoes)[None, LEAD:]


AIR_DB, CUTOFF_HZ = -64, 17100  # air level; treble is gone above the cutoff
OVERLOAD = .95  # peaks round off toward this height
# colour of the steady air: pitch_hz, density_db (relative)
AIR_COLOUR = [(24, -31), (40, -29), (96, -8), (276, -8), (363, -9), (392, -11.5), (491, -10.5), (770, -17),
              (852, -12), (7170, -24), (9500, -38), (16000, -40.5)]
# response of the microphone after its low cut: pitch_hz, gain_db
MIC_RESPONSE = [(30, 40), (90, -2), (1500, -8.5), (4000, -8.5), (7000, -11.5), (9000, -26), (12000, -37.5),
                (16000, -41)]


def record(dry):
    """A small microphone cuts deep bass, dulls the upper treble and rounds peaks, over the hall's steady air."""
    air = from_db(AIR_DB) * rms_one(coloured(rng.standard_normal(N), AIR_COLOUR))
    low_cut = signal.butter(6, 90, "high", fs=SR, output="sos")
    heard = coloured(signal.sosfilt(low_cut, dry[0]), MIC_RESPONSE) + air
    rounded = OVERLOAD * np.tanh(heard / OVERLOAD)
    treble_cut = signal.cheby2(12, 70, CUTOFF_HZ, fs=SR, output="sos")
    return signal.sosfilt(treble_cut, rounded)[None]


dry = scene()
out = record(dry)
materialize(out)
```